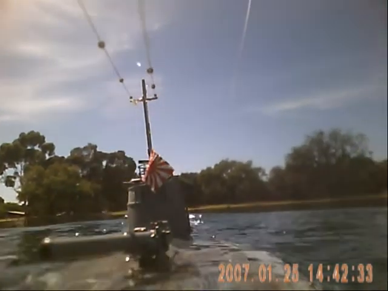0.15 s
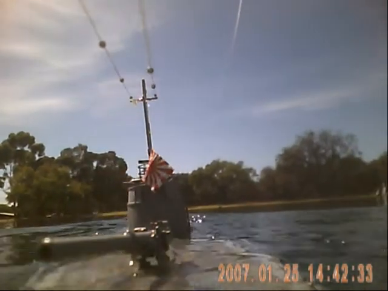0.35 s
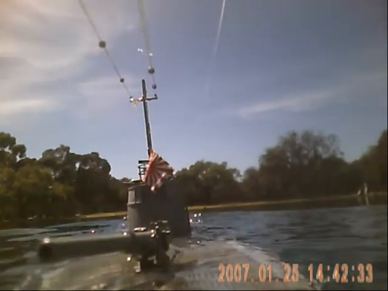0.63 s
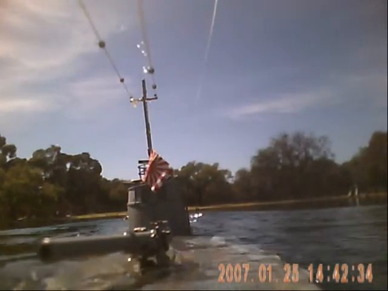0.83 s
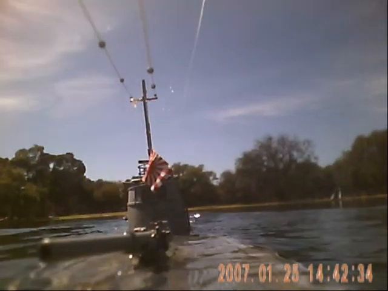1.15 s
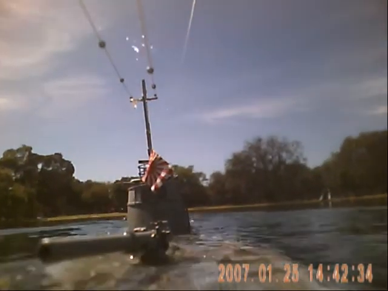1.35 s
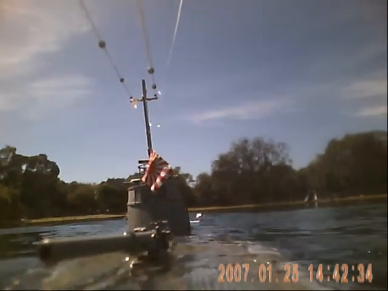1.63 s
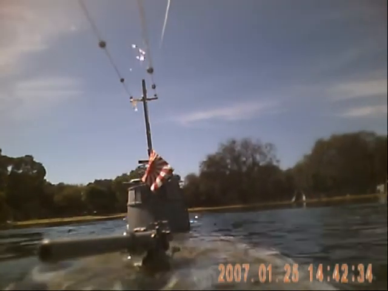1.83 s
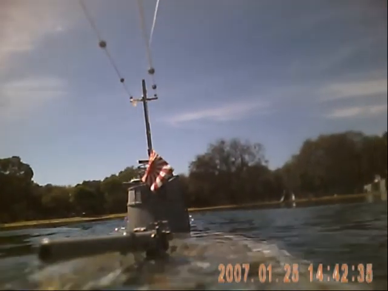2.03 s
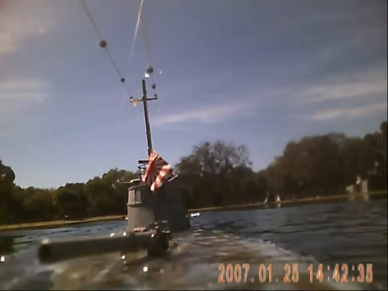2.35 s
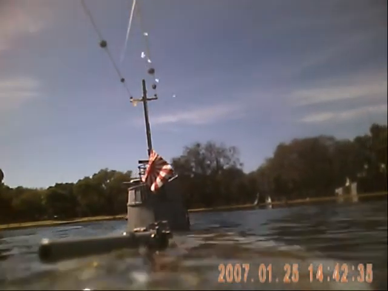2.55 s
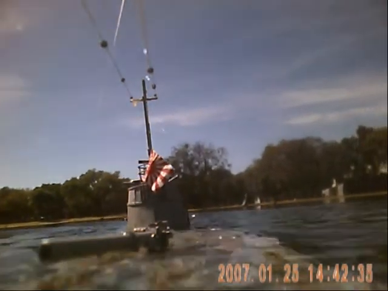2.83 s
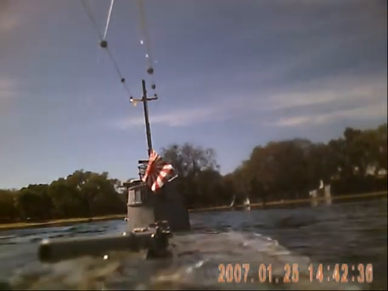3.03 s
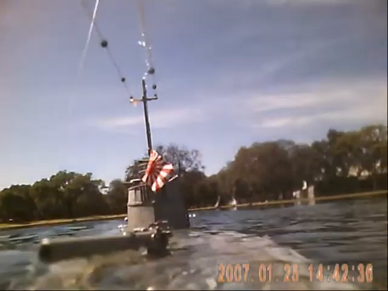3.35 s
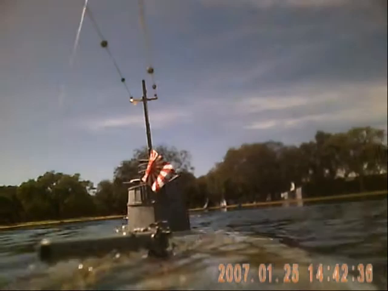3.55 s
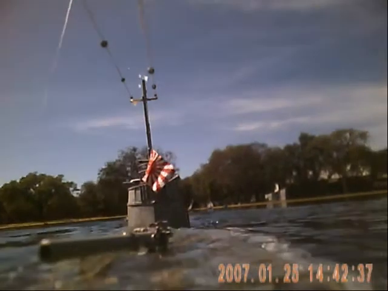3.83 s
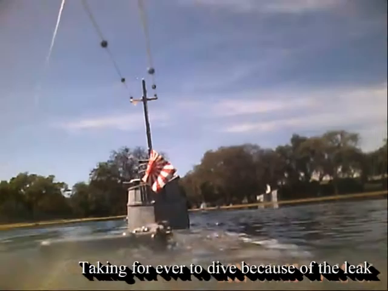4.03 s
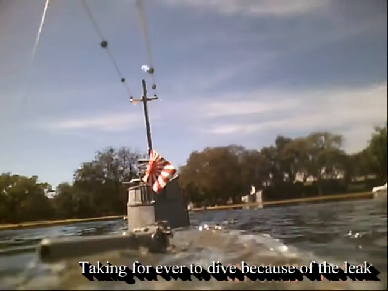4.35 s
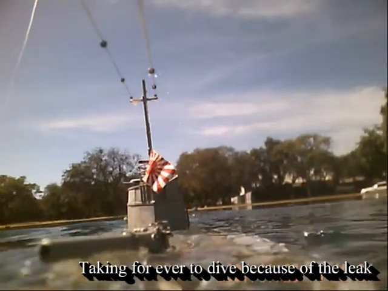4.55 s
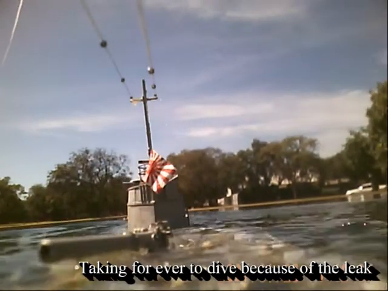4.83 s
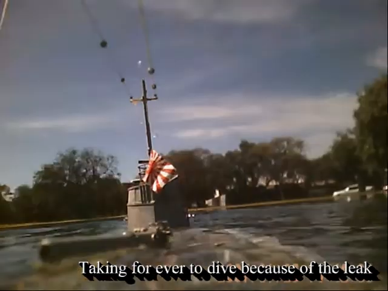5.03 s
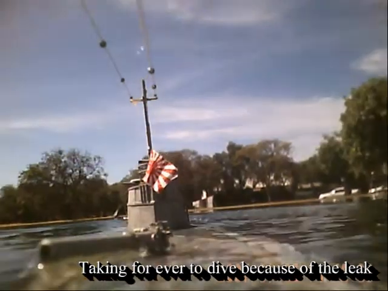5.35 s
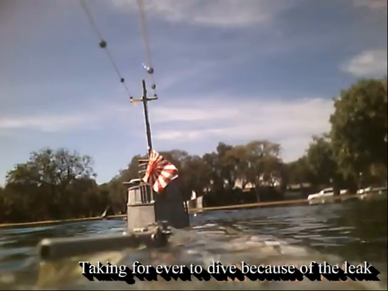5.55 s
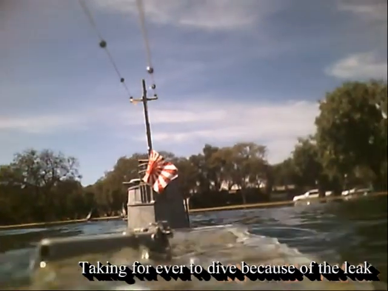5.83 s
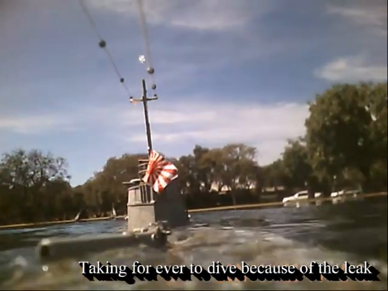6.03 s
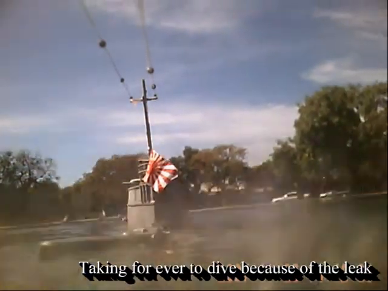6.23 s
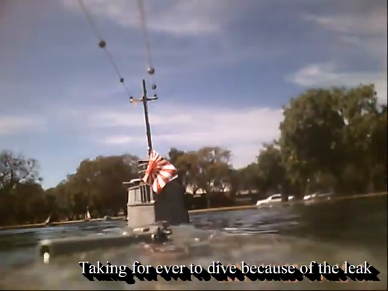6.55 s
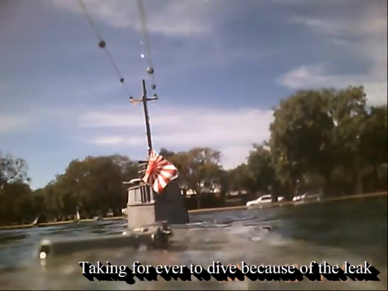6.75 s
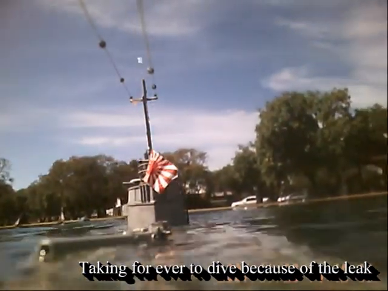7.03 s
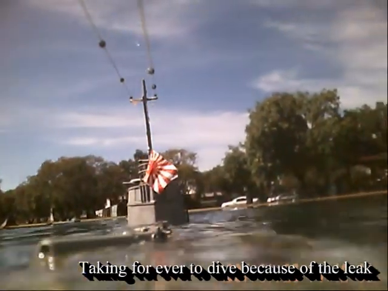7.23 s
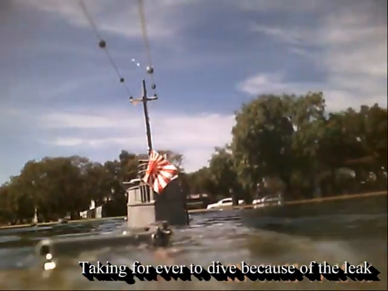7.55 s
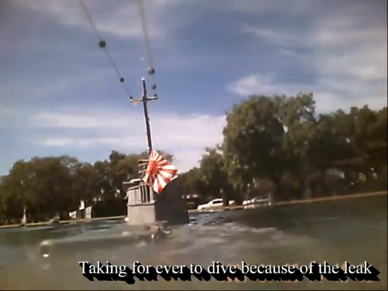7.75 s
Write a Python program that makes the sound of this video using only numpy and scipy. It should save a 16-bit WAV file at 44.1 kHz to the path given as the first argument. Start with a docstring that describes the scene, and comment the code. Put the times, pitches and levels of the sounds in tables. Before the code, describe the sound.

Two small geared electric motors run without a break in a model boat on a lake. Their knocks, about forty a second, fuse into a rough buzz over gritty gear grind and a wavering whine around 1.2 kilohertz. A low hum throbs about twice a second or faster. A rapid, squeaky seal chirp rides above. The microphone is attached to the hull, close and dry, with hiss and slightly crushed peaks.

```python
"""Model submarine under way

On board a model submarine on a lake, two geared electric drives turn at about 40 and 41 turns a second.
Shaft hums, sums of low harmonics, beat into a throb; gear whines are swaying sines at the tooth rate.
Each drive knocks once a turn through hull-filtered pulses and noise; gear grind and brush rasp are
filtered noise. The fast shaft's seal chirps and rubs each turn, and a thin steady tone lies beneath.
A cheap deck camera adds filtered noise as hiss, flattens the deepest dips and cuts the top."""
import sys
import numpy as np
from scipy.fft import rfft, irfft, next_fast_len
from scipy.io import wavfile
from scipy.ndimage import map_coordinates

SR = 44100
rng = np.random.default_rng(int(sys.argv[2]) if len(sys.argv) > 2 else 0)


def put_to_file(sound):
    """Save the sound as 16-bit audio at rate SR, in the file named by the first command-line argument."""
    columns = np.atleast_2d(sound).T  # one column per channel
    safe = np.clip(columns, -1, 1)
    whole_steps = np.round(safe * 32767)
    wavfile.write(sys.argv[1], SR, whole_steps.astype(np.int16))


N = 347949  # length in samples

# Microphone hiss colour: f/Hz, relative level/dB per Hz
HISS_COLOUR = [(20, 22), (300, 3), (4500, -1), (7000, -3.5), (10000, -6), (13500, -10.5)]
# Thin steady tone, fading up and down: t/s, level/dB
THIN_TONE_LEVEL = [(0, -57), (4, -49), (6, -40.5), (7.89, -45)]
# Brush rasp in a resonance of the motor cans: f/Hz, relative level/dB per Hz
BRUSH_COLOUR = [(1200, -38.5), (1620, -7.5), (1780, -1.5), (2020, 1.5), (2300, -4.5), (2700, -13),
                (4000, -42)]
# Brush rasp, loudest near the start: t/s, level/dB
BRUSH_LEVEL = [(0, -36), (.9, -34.5), (3.5, -37), (7.89, -37)]
# The seal's rub over one turn: share of the turn, pitch f/Hz, relative level/dB, octave level/dB
SEAL_RUB = [(0, 3110, -36, -12), (.06, 3057, -28, -4), (.12, 3042, 13, -5), (.165, 2588, 17, -2.5),
            (.23, 2577, 13.5, -16.5), (.34, 2586, 0, -16), (.46, 3087, -4.5, -31), (.68, 3393, 2, -42),
            (.8, 3830, -6.5, -40), (.9, 3800, -12, -40), (1, 3050, -24, -31)]
# How the seal's grip shifts: t/s, octave boost in the chirp's tail level/dB, late rub boost level/dB
SEAL_GRIP = [(0, 5.5, -1), (3.3, 1.5, -9.5), (5.5, -3, -3.5), (7.89, -2, 5)]
# Squeak, building and fading once: t/s, level/dB
SQUEAK_LEVEL = [(0, -38.5), (3.6, -34.5), (5.2, -35), (7.89, -37)]
# Sideways load on the shafts, rising and easing once as the boat comes round: t/s, load/0-1
SIDEWAYS_LOAD = [(0, .15), (1.6, 0.09), (2.9, 0.9), (4.1, .75), (5.9, 0), (7.89, 0.17)]
# The load shifts contact from the fast gear to the slow gear: unloaded level/dB, change at full load/dB
SLOW_WHINE_LEVEL = (-35.5, 2.9)
FAST_WHINE_LEVEL = (-27.5, -6.5)
# Gear teeth grinding, heard through the hull: f/Hz, relative level/dB per Hz
GRIND_COLOUR = [(60, -39.5), (150, -15.5), (270, -13), (360, -3.5), (550, 0.5), (720, -7.5), (1080, -12),
                (1270, -6), (1450, -13), (1620, -18.5), (2750, -27), (3500, -26), (3900, -30.5),
                (4300, -56)]
# Both shafts sag and recover with the drag of the water: t/s, slow shaft turns/s, fast shaft turns/s
SHAFT_SPEED = [(0.0, 39.565, 41.415), (1.44, 39.575, 41.402), (1.81, 39.407, 41.102),
               (2.05, 39.565, 41.774), (2.38, 39.361, 40.986), (2.57, 39.584, 41.445),
               (3.25, 39.313, 41.085), (3.46, 39.296, 41.297), (4.31, 39.597, 41.389),
               (5.09, 39.549, 41.573), (5.34, 39.455, 41.211), (5.75, 39.668, 41.477),
               (6.59, 39.516, 41.472), (6.91, 39.393, 40.935), (7.23, 39.439, 41.67),
               (7.36, 39.414, 41.057), (7.89, 40.135, 42.019)]
# Hum harmonics of each drive: multiple of the shaft speed, relative level/dB
SLOW_HARMONICS = [(1, -29), (2, 0), (3, -9.5), (4, -23.5), (6, -13)]
FAST_HARMONICS = [(1, -12.5), (2, 1.5), (3, -6), (4, -14), (5, -4.5), (6, -6)]
# Both hums easing off together: t/s, level/dB
HUM_LEVEL = [(0, -32.5), (1.9, -32), (5, -34), (7.89, -36)]
# Hull response to a knock of each drive: f/Hz, relative level/dB
SLOW_KNOCK_HULL = [(150, -41), (270, -20.5), (315, -2.5), (395, -4), (435, -3.5), (510, 0), (555, 5.5),
                   (595, -3), (635, 3), (730, -10), (790, -18), (830, -3.5), (900, -19.5), (950, -4.5),
                   (1050, -27), (2500, -55.5)]
FAST_KNOCK_HULL = [(200, -37.5), (320, -27), (370, 7.5), (430, -9), (500, 5.5), (560, 2), (660, -25),
                   (830, -5), (950, -3.5), (1100, -16.5), (2500, -59)]

TOP_HZ = 13650  # camera band limit
WHINE_DB_PER_HZ = 0.14  # a gear sings louder as its pitch rises
FAST_HUM_UNDER_DB = 6.0  # the fast drive hums more weakly; this sets the depth of the throb


def amp(db):
    """Decibels to gain."""
    return 10 ** (np.asarray(db) / 20)


def unit(x):
    """Scale to rms 1."""
    return x / np.sqrt(np.mean(x ** 2) + 1e-20)


def curves(rows, at=None):
    """Each column after the first, read at every sample time or at the given positions."""
    position, *columns = np.transpose(rows)
    at = np.arange(N) / SR if at is None else at
    return [np.interp(at, position, column) for column in columns]


def wobble(rate):
    """A smooth random curve, rate knots a second."""
    knots = rng.standard_normal(int(N * rate / SR) + 4)
    return map_coordinates(knots, [np.arange(N) * rate / SR])


def coloured(x, points):
    """x through a causal minimum-phase filter of the given (Hz, dB) shape, at rms 1."""
    m = 2 * next_fast_len(N // 2 + SR // 4)
    f, db = np.transpose(points)
    gain = amp(np.interp(np.log(np.fft.rfftfreq(m, 1 / SR) + 1), np.log(f), db))
    # folding the cepstrum forward in time makes the filter causal
    cepstrum = irfft(np.log(gain), m)
    cepstrum[1:m // 2] *= 2
    cepstrum[m // 2 + 1:] = 0
    response = np.exp(rfft(cepstrum))
    return unit(irfft(rfft(x, m) * response, m)[:N])


def dispersed(x, travel_ms, centre_hz):
    """Bending waves in the hull carry high tones faster than low ones; centre_hz keeps its timing."""
    f = np.fft.rfftfreq(N, 1 / SR)
    lag_cycles = travel_ms / 10 ** 3 * (2 * np.sqrt(centre_hz * f) - f)
    return irfft(rfft(x) * np.exp(-2j * np.pi * lag_cycles), N)


def shafts():
    """Running turn count of the slow and the fast shaft, each summed from its speed."""
    slow, fast = np.cumsum(curves(SHAFT_SPEED), axis=1) / SR
    return slow + .022, fast + .162  # starting angles in turns


def loaded(whine_level):
    """Gain of a gear's whine as the sideways load bears on it."""
    unloaded_db, change_db = whine_level
    return amp(unloaded_db + change_db * curves(SIDEWAYS_LOAD)[0])


def microphone_hiss():
    """The camera's own noise: random samples through a fixed colour."""
    return amp(-47) * coloured(rng.standard_normal(N), HISS_COLOUR)


def thin_tone(sway):
    """A faint whistle near 1478 Hz, its phase swaying a little, whatever the shafts do."""
    phase = 2 * np.pi * 1478 * np.arange(N) / SR
    return amp(curves(THIN_TONE_LEVEL)[0]) * unit(np.sin(phase + sway * wobble(14)))


def brush_rasp():
    """Motor brushes rasp as noise ringing in a resonance of the motor cans."""
    return amp(curves(BRUSH_LEVEL)[0]) * coloured(rng.standard_normal(N), BRUSH_COLOUR)


def squeak(turns, lead, pitch_spread, rasp, uneven_db, grain_db):
    """The seal grabs once a turn with a falling chirp, then rubs faintly at a rising pitch."""
    turn, share = np.divmod(turns + lead, 1)
    hz, level_db, octave_db = curves(SEAL_RUB, share)
    tail_db, late_db = curves(SEAL_GRIP)
    # the grip shifts fade in over these shares of the turn
    octave_db = octave_db + tail_db * np.interp(share, [.11, .16], [0, 1])
    level_db = level_db + late_db * np.interp(share, [.55, .75], [0, 1])
    hz = hz * (1 + pitch_spread * wobble(90) + rasp * wobble(2500))
    phase = 2 * np.pi * np.cumsum(hz) / SR
    # every grab starts the vibration afresh
    phase = phase - phase[np.searchsorted(turn, turn)]
    fundamental = amp(level_db) * np.sin(phase)
    octave = amp(octave_db + 2.1 * wobble(300)) * np.sin(2 * phase)
    roughness = amp(uneven_db * wobble(60) + grain_db * wobble(900))
    return unit((fundamental + octave) * roughness)


def whine(turns, sway, flutter, rough_db, count):
    """The tone of count gear teeth meshing; backlash lets it sway and flutter, and it swells with pitch."""
    mesh = 2 * np.pi * count * turns + sway * wobble(9)
    hz = np.gradient(mesh) * SR / (2 * np.pi)
    swell_db = WHINE_DB_PER_HZ * (hz - hz.mean())
    tone = np.sin(mesh + flutter * wobble(110))
    return unit(tone * amp(swell_db + rough_db * wobble(70)))


def hum(turns, harmonics):
    """Unbalance and the coupling shake the hull at low multiples of the shaft speed."""
    angle = 2 * np.pi * (turns + .055)
    return np.sqrt(2) * sum(amp(db) * np.cos(round(k) * angle) for k, db in harmonics)


def grinding(grain_db):
    """Countless uneven tooth contacts excite the hull: noise with a grainy level, then coloured."""
    return coloured(rng.standard_normal(N) * amp(grain_db * wobble(400)), GRIND_COLOUR)


def knocks(turns, hull, place, scatter_ms, uneven_db, rattle, rattle_width, travel_ms):
    """Play in the drive closes once a turn: a knock in a short rattle, smeared on its way along the hull.

    place and rattle_width are shares of a turn; rattle is its rms beside the blows."""
    count = np.arange(1, int(turns[-1]) + 1)
    chance = rng.standard_normal((len(count), 2))
    at = np.interp(count - place, turns, np.arange(N))
    at = at + chance[:, 0] * scatter_ms * SR / 10 ** 3
    blows = np.bincount(np.clip(at, 0, N - 1).astype(int), amp(uneven_db * chance[:, 1]), N)
    # distance from the nearest knock, in turns
    away = (turns + place + .5) % 1 - .5
    chatter = rng.standard_normal(N) * np.exp(-.5 * (away / rattle_width) ** 2)
    struck_hull = coloured(unit(blows) + rattle * unit(chatter), hull)
    return dispersed(struck_hull, travel_ms, centre_hz=499.2)


def scene():
    """Both drives sounding through one hull."""
    slow, fast = shafts()
    brushes = brush_rasp()
    seal = amp(curves(SQUEAK_LEVEL)[0]) * squeak(
        fast, lead=.225, pitch_spread=0.009, rasp=0.038, uneven_db=1.46, grain_db=2.2)
    gears = loaded(SLOW_WHINE_LEVEL) * whine(slow, sway=1.2, flutter=0.57, rough_db=2.0, count=30)
    gears += loaded(FAST_WHINE_LEVEL) * whine(fast, sway=2.77, flutter=0.48, rough_db=2.5, count=30)
    gears += amp(-24.0) * grinding(grain_db=1.5)
    # the slightly different speeds make the summed hum throb
    hums = hum(slow, SLOW_HARMONICS) + amp(-FAST_HUM_UNDER_DB) * hum(fast, FAST_HARMONICS)
    hums = amp(curves(HUM_LEVEL)[0]) * hums
    knocking = amp(-24.5) * knocks(
        slow, SLOW_KNOCK_HULL, place=0.1047, scatter_ms=0.072, uneven_db=0.06,
        rattle=0.27, rattle_width=0.098, travel_ms=12)
    knocking += amp(-33) * knocks(
        fast, FAST_KNOCK_HULL, place=.37, scatter_ms=0.17, uneven_db=2.1,
        rattle=0.38, rattle_width=0.13, travel_ms=28)
    return (thin_tone(sway=0.67) + brushes + seal + gears + hums + knocking)[None]


def record(dry):
    """The camera adds hiss, sits off centre so the deepest dips flatten, and cuts all above its band limit."""
    heard = dry + microphone_hiss()
    # a soft floor: the knee rounds the signal off as it nears the lower rail (full scale = 1)
    offset, rail, knee = -.6375, -.995, .015
    heard = rail + knee * np.logaddexp(0, (heard + offset - rail) / knee)
    return irfft(rfft(heard) * (np.fft.rfftfreq(N, 1 / SR) < TOP_HZ), N)


dry = scene()
out = record(dry)
put_to_file(out)
```